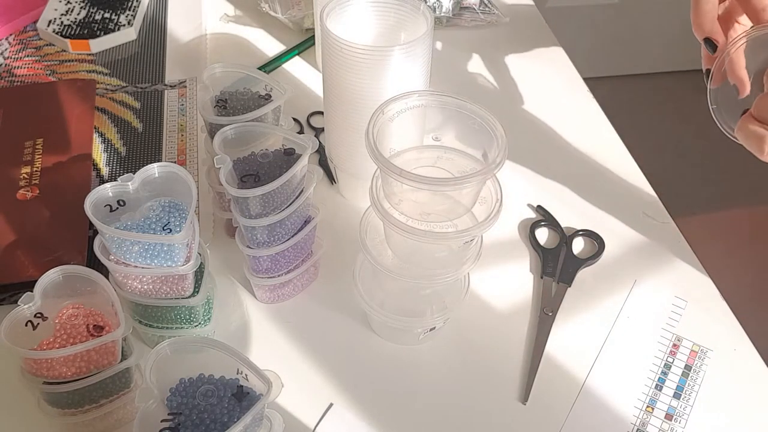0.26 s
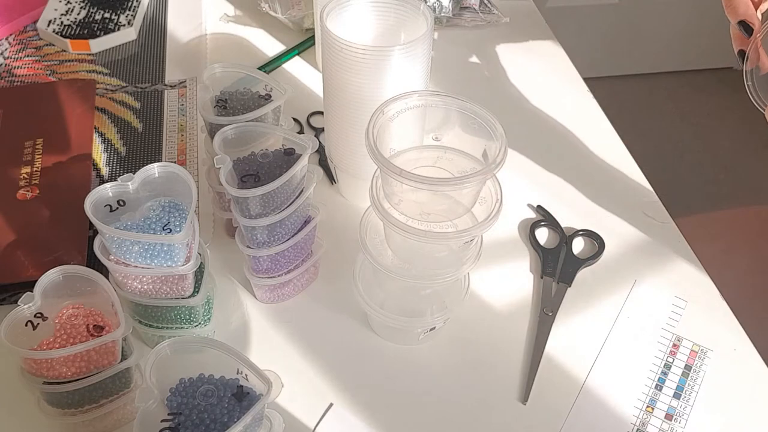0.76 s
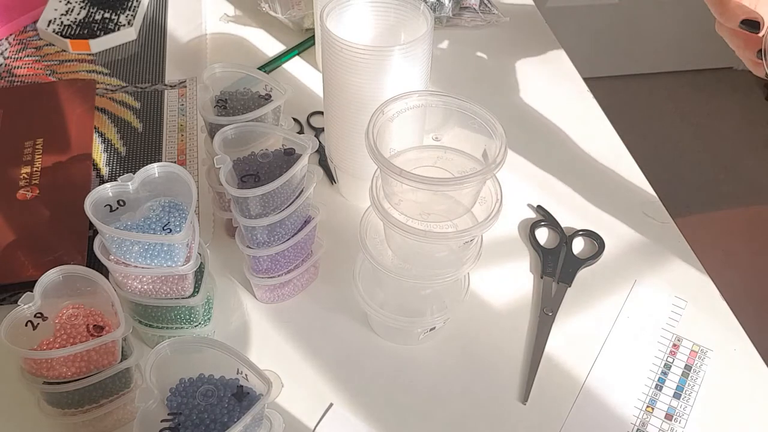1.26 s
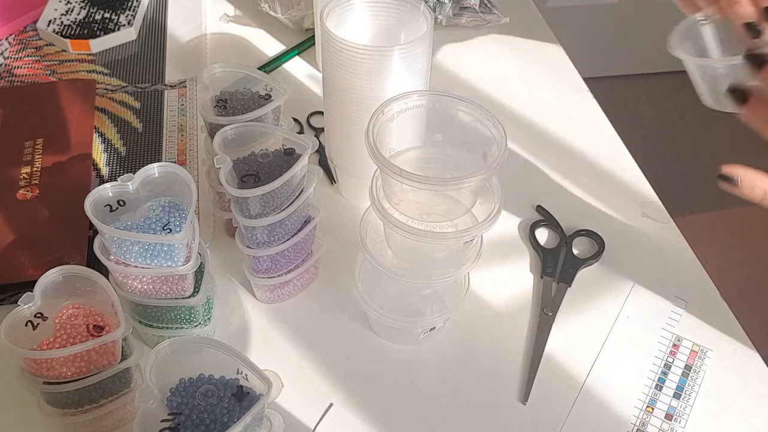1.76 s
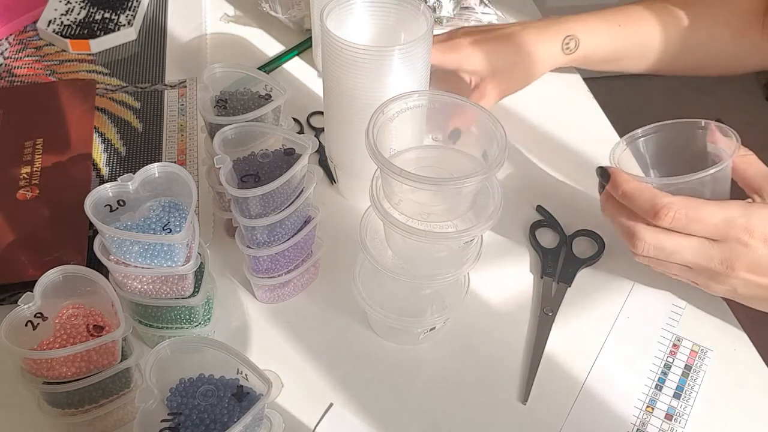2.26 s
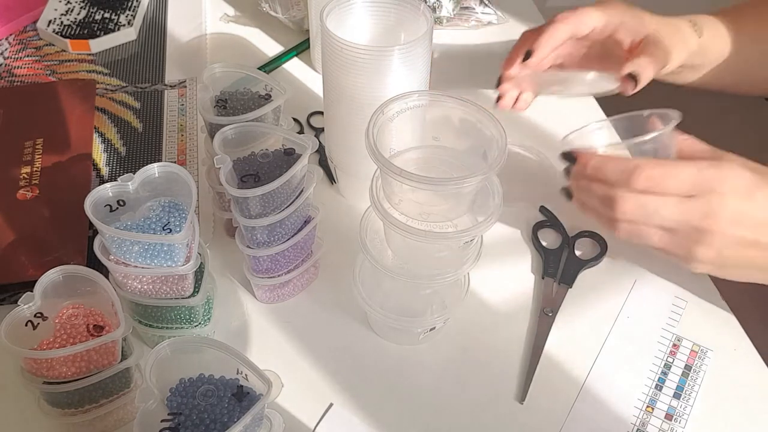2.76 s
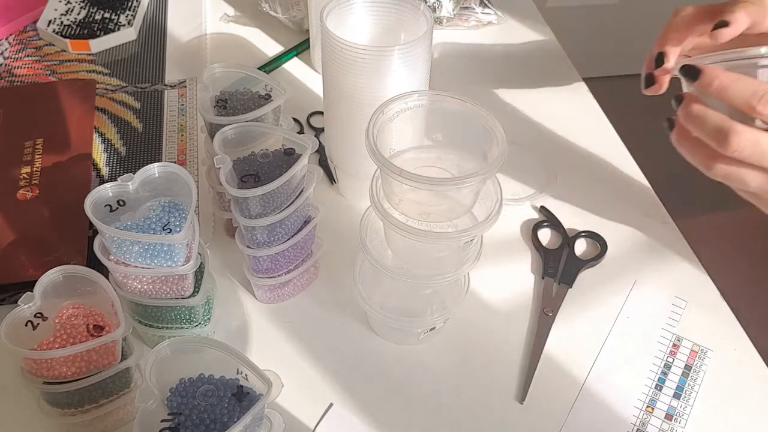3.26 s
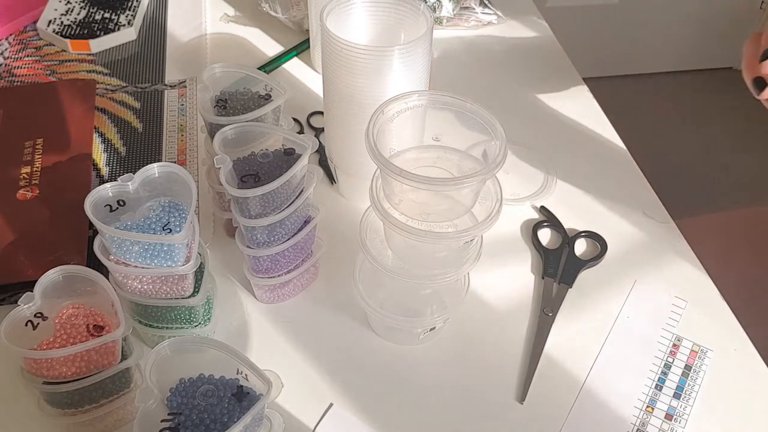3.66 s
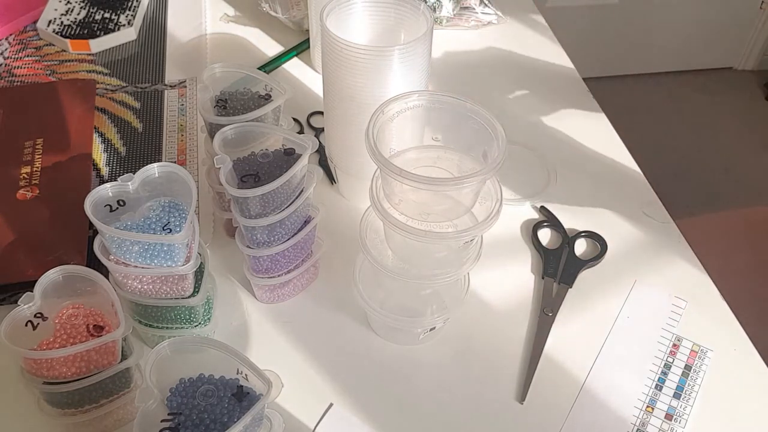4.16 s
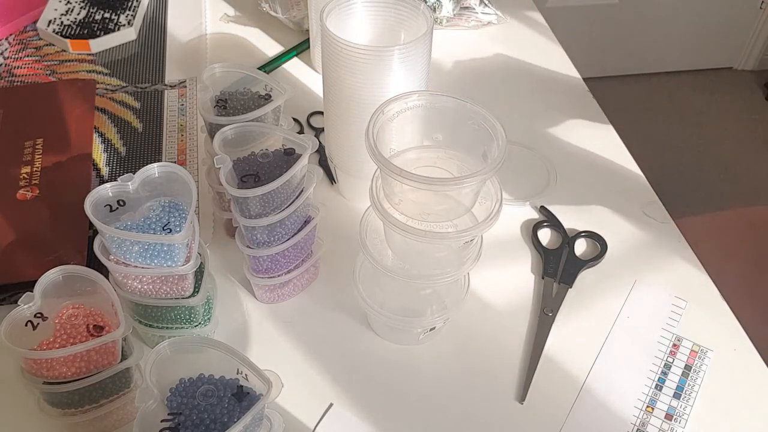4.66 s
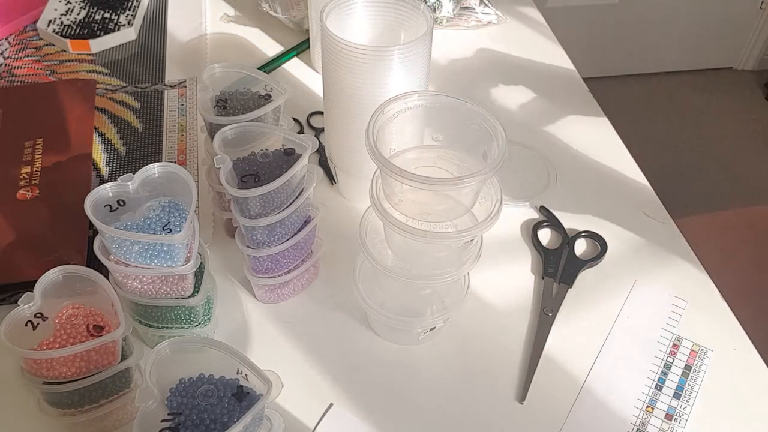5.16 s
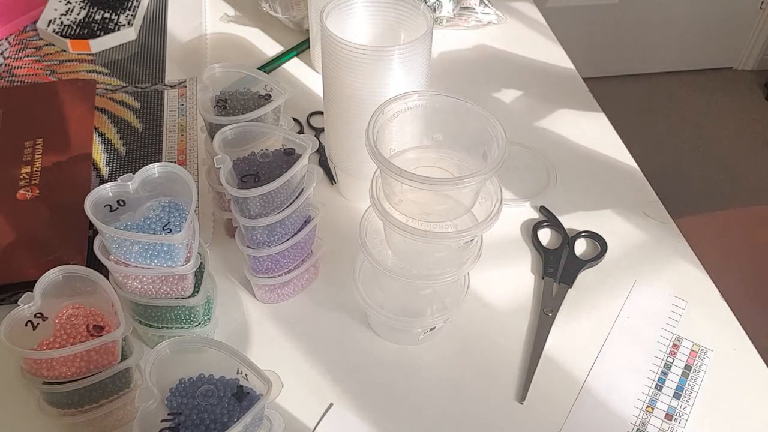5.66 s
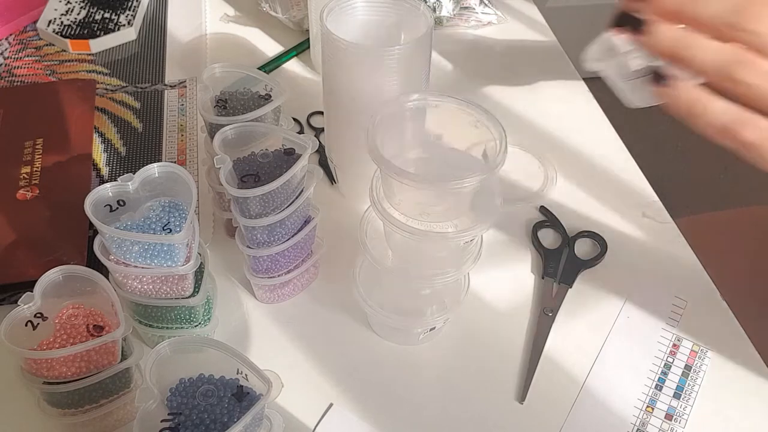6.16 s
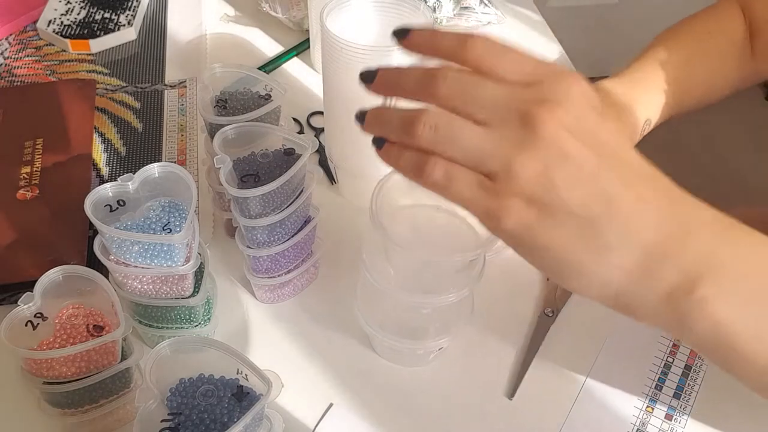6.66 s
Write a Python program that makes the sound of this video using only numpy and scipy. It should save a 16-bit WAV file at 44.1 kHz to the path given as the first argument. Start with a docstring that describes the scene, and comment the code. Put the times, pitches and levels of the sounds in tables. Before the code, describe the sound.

Close, dry plastic handling with a short bright room echo, mostly slightly left. Sparse tiny clicks grow into clustered crinkling as a lid is fitted onto a pot, with strong cracks and a rapid run of ticks. After a few weak taps, a pot lands on a stack with a full hollow clack. Beneath it are low, fluttering machine hum, room rumble and soft hiss.

```python
"""Small hard room, table: thin plastic pots and lids are handled over a far compressor and microphone hiss.
Snaps and lid ticks: jerk and chatter drive floor, cup air, wall and rim modes. Rubbing: clumped slips drive
gliding cup and wall modes plus rim fizz. Slide: noise through a narrow note that mostly rises.
Set-down: soft pushes ring low table modes. Hum: beating shaft and mains tones. Air: coloured stereo noise."""
import sys
import numpy as np
from scipy import signal
from scipy.fft import rfft, irfft, next_fast_len
from scipy.io import wavfile
from scipy.ndimage import uniform_filter1d, map_coordinates

SR = 44100
rng = np.random.default_rng(int(sys.argv[2]) if len(sys.argv) > 2 else 0)


def unload_wav(signal):
    """Save mono or channel-first audio to the path in sys.argv[1] as 16-bit WAV at rate SR, clipped to [-1, 1]."""
    wavfile.write(
        sys.argv[1],
        SR,
        np.round(np.clip(np.atleast_2d(signal).T, -1, 1) * 32767).astype(np.int16),
    )


N = 305172

# Snaps and knocks, levels before bass loss and pan: (time [s], crack peak [dB], cup air [Hz], wall [Hz],
# floor level [dB], cup air level [dB], wall level [dB], left minus right [dB])
SNAP_EVENTS = [(0.1536, -45, 785, 1870, -81, -71, -111, -3.0), (0.2987, -51, 597, 2310, -76, -69, -75, -4),
               (0.3861, -76, 750, 1550, -78, -89, -72, -2.5),
               (0.8868, -27.5, 803, 1540, -63, -54.5, -53, -6),
               (1.0286, -43, 390, 1540, -75, -80, -62.5, -9), (1.1114, -51, 520, 3770, -93, -73, -64, -4),
               (1.6067, -45.5, 774, 3830, -83, -83, -92, -14.5),
               (1.6762, -46.5, 858, 1540, -89, -61, -52, 10), (1.6881, -27.5, 786, 1630, -68, -46, -70, -1),
               (1.9586, -39, 830, 1710, -67, -62, -68, -2.5), (2.2203, -38, 380, 1560, -53.5, -48, -59, -5),
               (2.2714, -42.5, 890, 1690, -47.5, -58, -54.5, -3),
               (2.357, -33, 947, 2540, -61.5, -49.5, -52.5, -2.5),
               (2.4358, -34, 1320, 2450, -68, -56, -52, -5),
               (2.4797, -22, 928, 3240, -69, -57.5, -40.5, -5.5),
               (2.6659, -24.5, 1170, 2310, -38, -43, -33, -3),
               (3.0257, -68, 858, 2420, -89, -91, -68.5, -2.0),
               (3.1704, -32, 1397, 1450, -57.5, -48.5, -55, 0),
               (3.2388, -31.5, 1195, 1960, -57.5, -36, -46.5, -2.5),
               (3.2745, -44.5, 1310, 4020, -96, -44, -40.5, -1.0),
               (3.2901, -44, 1280, 4500, -51, -71, -39.5, -2),
               (3.345, -20.5, 1260, 1940, -49, -42, -43.5, 1.0),
               (3.3504, -27, 1230, 1430, -85, -43, -39.5, 0),
               (3.376, -21.5, 1195, 2030, -58, -42.5, -36.5, -1),
               (3.3809, -20.5, 1224, 2830, -53, -43, -70, -2.5),
               (3.4199, -40, 1093, 2620, -48, -35, -44.5, -1),
               (3.4961, -33, 1040, 1540, -71, -44.5, -50, -3),
               (3.5463, -30.5, 560, 1710, -89, -52.5, -53, -2),
               (3.5674, -45, 495, 4480, -71, -62, -49, -0.5), (3.5804, -43, 1130, 4550, -71, -54, -52, 8),
               (3.5927, -37.5, 571, 3770, -67, -65, -44.5, -4),
               (3.6022, -42, 498, 3740, -66, -66, -49, -11), (3.6134, -38.5, 498, 3650, -69, -77, -63, -7),
               (3.704, -32.5, 950, 4080, -60.5, -93, -53, 14),
               (3.7138, -43, 745, 3900, -68, -69, -46, -6.5),
               (3.864, -44, 1093, 2740, -58, -45.5, -63, -1.5),
               (3.9086, -55, 650, 1900, -67, -51, -77, -4.5),
               (3.9336, -40, 1150, 3630, -60, -49, -50, -1.5),
               (4.0963, -25.5, 636, 2300, -69, -47, -47, -1.5),
               (4.1454, -33, 654, 2360, -67.5, -49.5, -51, 1),
               (4.1797, -26, 550, 2330, -50.5, -57.5, -44, 2),
               (4.2177, -6.5, 600, 3320, -49.5, -36, -31, -4),
               (4.291, -29.5, 847, 4640, -66, -41.5, -30, -4.5),
               (4.3053, -13, 536, 3140, -64, -44.5, -30, -4),
               (4.3273, -29.5, 549, 2110, -72, -68, -38.5, 1.5),
               (4.359, -13, 557, 4700, -58, -43.5, -37, -6),
               (4.4687, -29, 450, 4080, -92, -87, -50.5, -2.5), (4.5043, -48, 414, 2370, -54, -64, -53, -2),
               (4.5992, -26.5, 582, 3600, -54, -47, -43, -7),
               (4.956, -40.5, 630, 2870, -87.5, -67, -65, -3),
               (5.0394, -26.5, 583, 4400, -81.5, -67, -53.5, 0),
               (5.1982, -43, 980, 4470, -84, -65, -43.5, -6),
               (5.2069, -20, 1180, 4600, -64.5, -54, -40.5, -6.5),
               (5.254, -2.5, 760, 2400, -37, -23.5, -22, -2.5),
               (5.3802, -36, 696, 3370, -88, -72, -57, 4.5), (5.4777, -58, 850, 2750, -93, -67, -62, -4),
               (5.665, -22.5, 990, 2620, -64, -56, -45, -5),
               (5.6955, -32.5, 725, 2790, -65, -44, -55.5, -4.5),
               (5.8275, -47, 825, 1730, -91, -63, -66, -0.5), (5.8404, -51, 887, 2390, -92, -60, -79, 5.5),
               (5.9377, -48.5, 891, 1605, -73, -65.5, -70, -4.5),
               (6.0057, -49, 813, 2004, -67, -56.5, -67, 0), (6.0252, -54, 624, 1905, -68.5, -57, -66, -4),
               (6.4759, -53, 705, 1430, -42.5, -49, -43.5, -3.5),
               (6.519, -25, 918, 1660, -26.5, -16, -19.5, -2.5),
               (6.5859, -47, 702, 1550, -31, -18.5, -26.5, -7),
               (6.7005, -47, 697, 1660, -50.5, -54.5, -57, -8)]
# Lid rim ratcheting over the lip of its pot: (time [s], crack peak before bass loss and pan [dB])
LID_TICKS = [(4.6224, -25.5), (4.6314, -24.5), (4.6404, -31.5), (4.6508, -22), (4.6643, -22.5),
             (4.6804, -28.5), (4.6884, -34), (4.6992, -20), (4.7162, -23), (4.7234, -39.5), (4.7434, -23),
             (4.7504, -31), (4.7574, -30), (4.7724, -33), (4.7884, -28.5), (4.8014, -30.5), (4.8134, -30.5)]
TICK_AIR_HZ, TICK_WALL_HZ, TICK_PAN_DB = 560, 3686, -3
TICK_FLOOR_DB, TICK_AIR_DB, TICK_WALL_DB = -48, -30.5, -16.5  # relative to crack peak
RING_S, CONTACT_S = 0.0068, 0.0027  # body energy reference span; time for contact to fall 20 dB

# Flat pot bottom; rim and lid: (frequency [Hz], width [Hz], relative level [dB])
FLOOR_MODES = [(277.5, 40, -6), (419.4, 20, -4), (581, 16, -3.5), (910, 85, -7.5), (1030, 10, -6)]
RIM_MODES = [(4100, 2440, -2), (5800, 2920, 8), (8340, 530, 3), (9000, 760, 3), (11600, 27000, -0.5)]
# Cup air; pot wall; wall under a dragged rim: (ratio to note [-], width / note [-], relative level [dB])
CUP_MODES = [(0.62, .2, -13.5), (1, 0.069, 5), (1.6, 0.74, -11.5)]
WALL_MODES = [(.72, 1, -12.5), (1.001, 0.15, 0), (1.25, 0.32, -11)]
SCRAPE_MODES = [(.7, 0.18, -11.5), (1, 0.069, 4.5), (1.45, 1, -12)]

# Sliding fingers and rims, levels at full pressure before wobble: (start [s], length [s],
# cup air level [dB], wall level [dB], fizz level [dB], cup air [Hz], wall [Hz])
RUB_STROKES = [(0.078, 0.1, -87, -83, -72.5, 780, 1810), (0.29, 0.12, -73.5, -100, -82, 820, 1550),
               (0.855, 0.08, -86, -65, -64, 820, 1480), (1.016, 0.1, -94, -79, -64, 650, 1510),
               (1.354, 0.099, -98, -88, -60, 780, 3760), (1.452, 0.1, -80.5, -75.5, -69, 780, 4000),
               (1.617, 0.1, -73, -66, -63, 780, 1466), (1.925, 0.081, -66.5, -71.5, -61, 900, 1850),
               (2.202, 0.1, -57, -55, -54.5, 560, 1750), (2.311, 0.17, -70, -59, -60, 950, 2420),
               (2.471, 0.18, -108, -55.5, -50.5, 1210, 2670), (3.182, 0.041, -77, -63, -65, 1380, 1493),
               (3.219, 0.14, -86, -95, -59, 1290, 3750), (3.324, 0.097, -44.5, -59, -47.5, 1250, 1995),
               (3.436, 0.17, -57.5, -56.5, -59, 560, 3600), (3.627, 0.16, -68.5, -59.5, -59.5, 780, 3620),
               (3.885, 0.072, -54, -60, -59.5, 1160, 2786), (3.944, 0.109, -55.5, -55, -59, 600, 2510),
               (4.024, 0.23, -60, -56.5, -64.5, 600, 2406), (4.21, 0.12, -54.5, -46, -46.5, 560, 3090),
               (4.422, 0.12, -76, -64, -63.5, 520, 3960), (4.582, 0.2, -70, -52, -46, 560, 3880),
               (4.853, 0.16, -73.5, -83, -73.5, 600, 1460), (5.047, 0.11, -71, -72, -62, 560, 2800),
               (5.177, 0.1, -65, -47, -40, 1340, 2360), (5.379, 0.15, -82, -75.5, -72, 780, 2800),
               (5.497, 0.2, -69.5, -76.5, -76, 780, 2698), (5.668, 0.023, -56.5, -55, -64, 780, 2800),
               (5.811, 0.049, -71, -72, -73.5, 900, 2350), (5.92, 0.15, -86, -72.5, -70, 600, 2556),
               (6.138, 0.2, -95.5, -82, -78, 780, 4460), (6.41, 0.09, -63, -76.5, -81, 550, 1466),
               (6.608, 0.1, -84, -70, -73.5, 730, 2024), (6.88, 0.04, -73.5, -82, -70.5, 520, 1590)]
RISE, FALL = 0.33, 0.64  # shares of stroke length; fall begins at its end

# Lid sliding off its pile: (time [s], level before pan [dB], note [Hz])
LID_SLIDE = [(2.533, -52.5, 2130), (2.574, -50, 2270), (2.61, -50, 2330), (2.657, -45, 2530),
             (2.662, -42, 2500)]
# Pushes on the table: (time [s], relative level [dB])
TABLE_PUSHES = [(2.22, -39), (2.262, -25), (2.308, -37), (2.356, -40.5), (5.253, -36.5), (6.518, -37),
                (6.589, -30.5)]
# Table top: (frequency [Hz], width [Hz], relative level [dB])
TABLE_MODES = [(136.6, 14, 12.5), (92, 30, -1.5)]

# Compressor tones: (shaft order [-], mains order [-], rms level before wobble and pan [dB])
HUM_TONES = [(1, 0, -93), (-1, 1, -86.5), (2, 0, -73.5), (0, 1, -71), (-2, 2, -96), (3, 0, -84),
             (1, 1, -76), (4, 0, -82.5), (2, 1, -93.5), (0, 2, -85), (1, 2, -88), (0, 3, -89.5),
             (0, 8, -86.5)]
SHAFT_HZ, MAINS_HZ, IN_STEP_S = 46.35, 100, .034  # tone phases align at IN_STEP_S, bar phase wobble

# Background spectrum: (frequency [Hz], relative density [dB/Hz])
AIR_SPECTRUM = [(15, -49), (25, -37.5), (43, -8.5), (97, -5), (200, -13), (242, -22.5), (309, -14),
                (451, -25), (796, -17.5), (962, -24.5), (4030, -33), (7310, -37.5), (11900, -25.5),
                (16000, -24.5)]
# Background stereo: (frequency [Hz], left-right likeness [-])
AIR_LIKENESS = [(60, 0.72), (300, 0.71), (1400, 0), (5000, 0.26), (9000, 1), (15000, 1)]
AIR_DB = -67.5  # rms before wobble

# Echo decay before the early boost: (frequency [Hz], t60 [s])
ROOM_T60 = [(150, 0.43), (500, 0.36), (1400, 0.27), (4000, 0.25), (10000, 0.21), (16000, 0.23)]
# Echo stereo: (frequency [Hz], left-right likeness [-])
ROOM_LIKENESS = [(100, 0.75), (600, 0.41), (2000, 0.51), (5000, 0.9), (10000, 1), (15000, 0.89)]
# Echo against direct sound, before the early boost: (frequency [Hz], level [dB])
ROOM_LEVEL = [(100, 14), (700, -5), (2500, -7), (5000, -7.5), (8000, -7.5), (15000, -5)]
TOP_HZ = 15900  # output band limit


def snaps():
    """A brief rough contact drives pot floor, cup air, wall and rim; lid ticks use the same bodies."""
    out, t_s = np.zeros((2, N + SR)), np.arange(SR // 8) / SR
    ticks = [(s, db, TICK_AIR_HZ, TICK_WALL_HZ,
              db + TICK_FLOOR_DB, db + TICK_AIR_DB, db + TICK_WALL_DB, TICK_PAN_DB) for s, db in LID_TICKS]
    contact = (1 - np.exp(-t_s / (0.5 * CONTACT_S))) * amp(-20 * t_s / CONTACT_S)
    jerk_at = np.arange(len(t_s)) == round(.3 * CONTACT_S * SR)
    for s, crack_db, air_hz, wall_hz, floor_db, air_db, wall_db, pan_db in SNAP_EVENTS + ticks:
        chatter = rng.standard_normal(len(t_s)) * contact
        jerk = jerk_at * np.linalg.norm(chatter)  # the plastic gives way once, then chatters
        push = jerk + 0.12 * chatter  # big slow bodies feel mostly the jerk
        force = 0.8 * jerk + chatter
        bend = np.exp(.05 * rng.standard_normal(len(RIM_MODES)))  # each grip shifts the rim notes
        bent_rim = [(hz * b, width_hz, db) for (hz, width_hz, db), b in zip(RIM_MODES, bend)]
        crack = filtered(force, modes(bent_rim))
        floor = amp(floor_db) * ring(filtered(push, modes(FLOOR_MODES)))
        cup = amp(air_db) * ring(filtered(push, about(air_hz, CUP_MODES)))
        wall = amp(wall_db) * ring(filtered(force, about(wall_hz, WALL_MODES)))
        x = floor + cup + wall + amp(crack_db) * crack / np.abs(crack).max()
        x = filtered(x, lambda f: (1j * f / (230 + 1j * f)) ** 2)  # small pot: weak bass radiation
        add_event(out, x, s, pan_db)
    return out[:, :N]


def rubbing(slips_hz=900, spread_db=4):
    """Tiny uneven slips in clumps excite cup, wall and rim; cup and wall notes change with each grip."""
    t_s = np.arange(N) / SR
    start_s, length_s, air_db, wall_db, fizz_db, air_hz, wall_hz = np.transpose(RUB_STROKES)
    u = (t_s - start_s[:, None]) / length_s[:, None]
    press = np.clip(np.minimum(u / RISE, 1 + (1 - u) / FALL), 0, 1) ** 2
    grip = np.clip(np.searchsorted(start_s, t_s) - 1, 0, None)
    air_hz = uniform_filter1d(air_hz[grip], size=SR // 50)
    wall_hz = uniform_filter1d(wall_hz[grip], size=SR // 50)

    slip_sizes = amp(spread_db * rng.standard_normal(N)) * rng.standard_normal(N)
    slips = (rng.random(N) < slips_hz / SR) * slip_sizes
    force = (unit(slips) + .4 * rng.standard_normal(N)) * amp(2 * wobble(35))
    cup = gliding(force, air_hz, np.geomspace(400, 1400, num=14), CUP_MODES)
    wall = gliding(force, wall_hz, np.geomspace(1400, 4500, num=10), SCRAPE_MODES)
    fizz = unit(filtered(force, modes(RIM_MODES)))
    x = (amp(air_db) @ press) * cup + (amp(wall_db) @ press) * wall + (amp(fizz_db) @ press) * fizz

    echoes, size = np.zeros((2, N + SR)), SR // 4  # new echo pattern every quarter second
    for start in range(0, N, size):
        echo = room(x[start:start + size])
        echoes[:, start:start + echo.shape[1]] += echo
    return place(x, -1.1) + echoes[:, :N]


def slide():
    """One rim drags over another and sings hoarsely: noise through a narrow, mostly rising resonance."""
    s, db, hz = np.transpose(LID_SLIDE)
    t_s = np.arange(round(s[0] * SR), round(s[-1] * SR)) / SR
    noise, notes_hz = rng.standard_normal(len(t_s)), np.geomspace(1800, 2900, num=6)
    note = gliding(noise, np.interp(t_s, s, hz), notes_hz, [(1, .1, 0)])
    x = amp(np.interp(t_s, s, db)) * note * signal.windows.tukey(len(t_s), .15)
    out = np.zeros((2, N + SR))
    add_event(out, x, s[0], -1.0)
    return out[:, :N]


def set_down():
    """A soft weight on the table rings only its lowest modes."""
    push = np.zeros(N)
    for s, db in TABLE_PUSHES:
        push[round(s * SR):][:200] += amp(db) * np.hanning(200)
    return amp(-1.5) * filtered(push, modes(TABLE_MODES)) * amp([[-1.3], [1.3]])


def hum():
    """Shaft turns slower than half the mains hum: neighbouring tones beat about seven times a second."""
    t_s = np.arange(N) / SR - IN_STEP_S
    tones = np.zeros(N)
    for shaft, mains, db in HUM_TONES:
        hz = shaft * SHAFT_HZ + mains * MAINS_HZ
        level = np.sqrt(2) * amp(db + 1.3 * wobble(5))
        tones += level * np.cos(2 * np.pi * hz * t_s + .15 * wobble(5))
    return tones * amp([[-.8], [.8]])


def air(uneven_db=1.2):
    """Room rumble and microphone hiss: coloured noise, gently uneven in level."""
    noise = paired(rng.standard_normal((2, N)), AIR_LIKENESS, AIR_SPECTRUM)
    return amp(AIR_DB + uneven_db * wobble(rate=5)) * unit(noise)


def room(x, gap_s=.003):
    """Stereo echo, newly drawn at random per call; each frequency dies at its own speed."""
    hz, t_s, z = signal.stft(rng.standard_normal((2, SR // 3)), SR, nperseg=256)
    t60_s = along(ROOM_T60, hz)[:, None]
    decay = amp(-60 * t_s / t60_s) / np.sqrt(t60_s * SR / np.log(1e6))  # near unit energy
    tail = signal.istft(z * decay, SR, nperseg=256)[1]
    # table and near wall answer first and louder
    tail = tail * (1 + 1.38 * np.exp(-np.arange(tail.shape[1]) / SR / 0.048))
    tail = paired(tail, ROOM_LIKENESS, ROOM_LEVEL)
    tail = np.pad(tail, ((0, 0), (round(gap_s * SR), 0)))
    return signal.fftconvolve(x[None], tail, axes=1)


def place(x, pan_db, lag_s=0.00015):
    """Level pan; the right port hears the hands later, a lag that vanishes in the treble."""
    panned = x * amp([[pan_db / 2], [-pan_db / 2]])
    return filtered(panned, lambda f: np.exp(-2j * np.pi * f * [[0], [lag_s]] / (1 + (f / 5000) ** 4)))


def add_event(out, x, start_s, pan_db):
    """Add direct sound and echo of x to out."""
    start, echo = round(start_s * SR), room(x)
    out[:, start:start + len(x)] += place(x, pan_db)
    out[:, start:start + echo.shape[1]] += echo


def modes(table):
    """Causal response of (Hz, width Hz, dB) resonances with alternating signs."""
    def response(f):
        total = 0
        for k, (hz, width_hz, db) in enumerate(table):
            damping = 1j * f * width_hz
            total = total + (-1) ** k * amp(db) * damping / (hz * hz - f * f + damping)
        return total
    return response


def about(hz, shape):
    """Resonances given as ratios of a note; little is radiated far from it."""
    response = modes([(hz * ratio, hz * width, db) for ratio, width, db in shape])
    return lambda f: response(f) * (1j * f / (0.14 * hz + 1j * f)) ** 2 / (1 + 1j * f / (4.1 * hz)) ** 2


def gliding(force, hz, notes_hz, shape):
    """A moving resonance: cross-fade between fixed ones of unit rms."""
    step, total = np.log(notes_hz[1] / notes_hz[0]), 0
    for note_hz in notes_hz:
        fade = np.clip(1 - np.abs(np.log(hz / note_hz)) / step, 0, 1)
        total = total + fade * unit(filtered(force, about(note_hz, shape)))
    return total


def paired(noise, alike, colour):
    """Two noises turned into left and right of a given likeness and (Hz, dB) colour."""
    def response(hz):
        turn = np.arccos(np.clip(along(alike, hz), -1, 1)) / 2
        return amp(along(colour, hz)) * [np.cos(turn), np.sin(turn)]
    mid, side = filtered(noise, response)
    return np.array([mid + side, mid - side])


def filtered(x, response):
    """x through a complex frequency response, zero-padded."""
    m = next_fast_len(x.shape[-1] + 8192)
    return irfft(rfft(x, m) * response(np.fft.rfftfreq(m, 1 / SR)), m)[..., :x.shape[-1]]


def wobble(rate):
    """Smooth random curve, rate knots a second."""
    knots = rng.standard_normal(int(N * rate / SR) + 4)
    return map_coordinates(knots, [np.arange(N) * rate / SR])


def along(points, hz):
    """(Hz, value) points interpolated on a log axis."""
    f, v = np.transpose(points)
    return np.interp(np.log(hz + 1), np.log(f + 1), v)


def ring(x):
    """Scaled to the energy of rms 1 over RING_S."""
    return x / np.linalg.norm(x) * np.sqrt(RING_S * SR)


def unit(x):
    """Scaled to rms 1."""
    return x / np.sqrt(np.mean(x ** 2) + 1e-20)


def amp(db):
    """Gain of a dB value."""
    return 10 ** (np.asarray(db) / 20)


def scene():
    """All sources at the two ports."""
    return snaps() + rubbing() + slide() + set_down() + hum() + air()


def record(dry):
    """Loudest peaks are rounded off, the very top droops and nothing is kept above TOP_HZ."""
    soft = dry / (1 + np.abs(dry / .9) ** 4) ** (1 / 4)
    return filtered(soft, lambda hz: (hz < TOP_HZ) / np.sqrt(1 + (hz / 15500) ** 8))


dry = scene()
out = record(dry)
unload_wav(out)
```